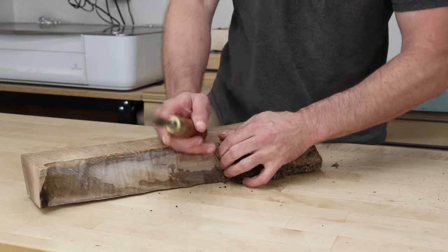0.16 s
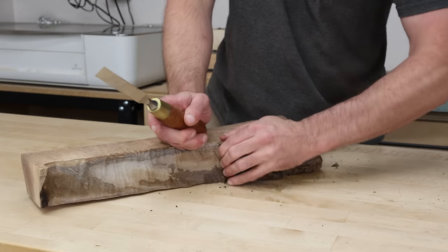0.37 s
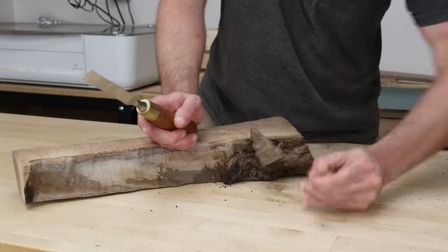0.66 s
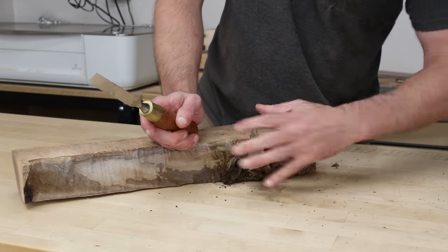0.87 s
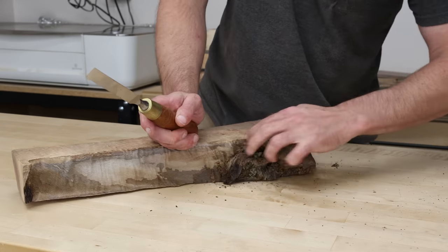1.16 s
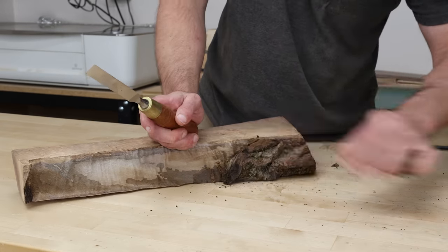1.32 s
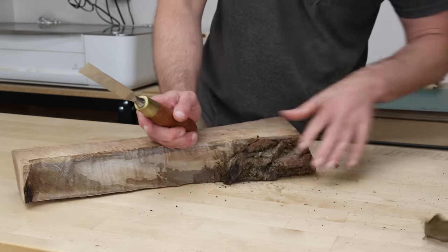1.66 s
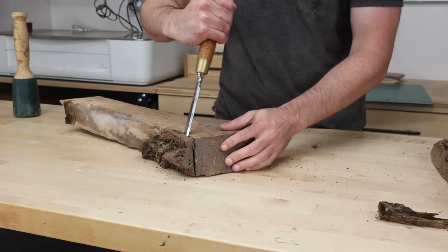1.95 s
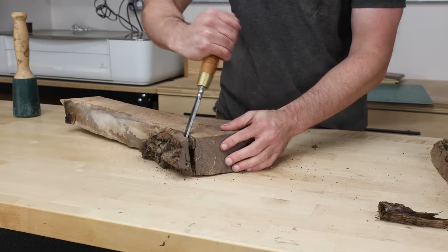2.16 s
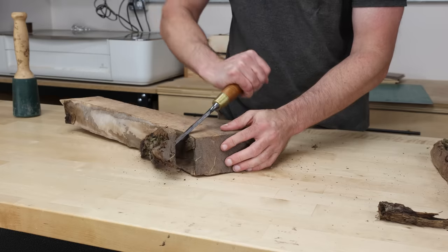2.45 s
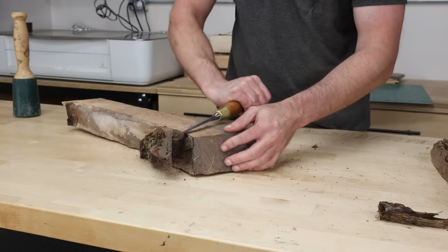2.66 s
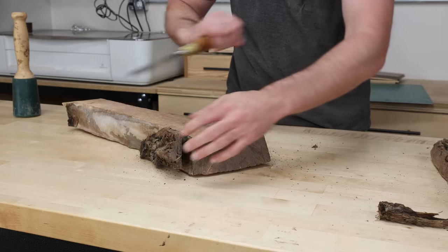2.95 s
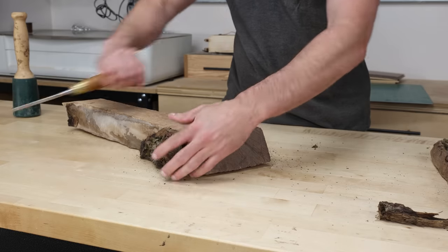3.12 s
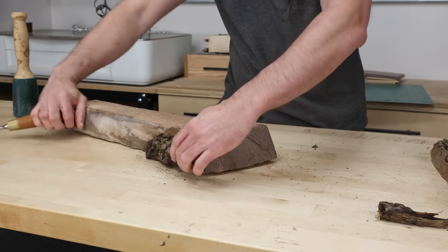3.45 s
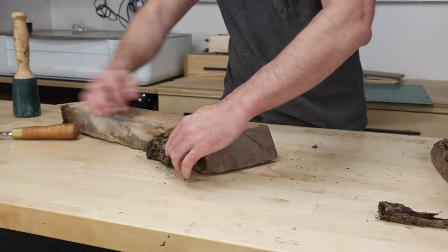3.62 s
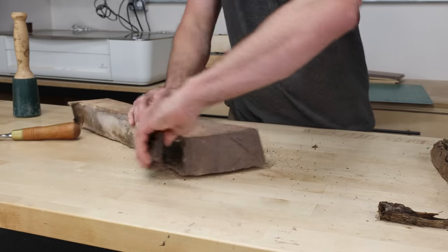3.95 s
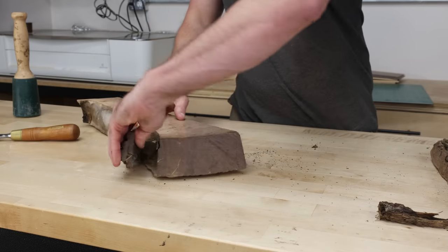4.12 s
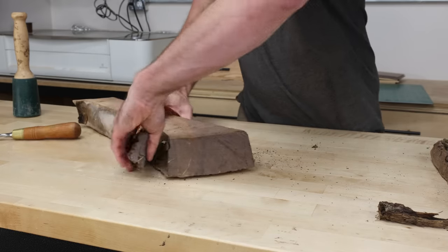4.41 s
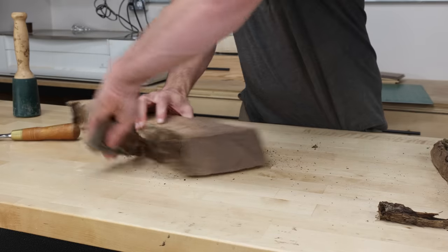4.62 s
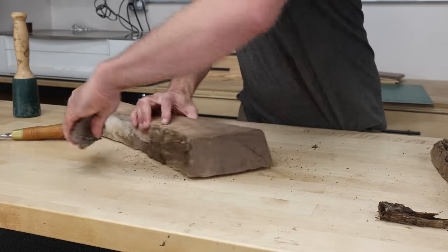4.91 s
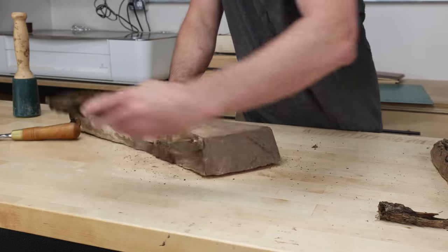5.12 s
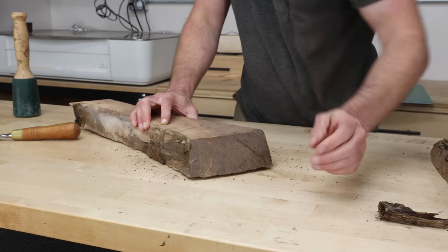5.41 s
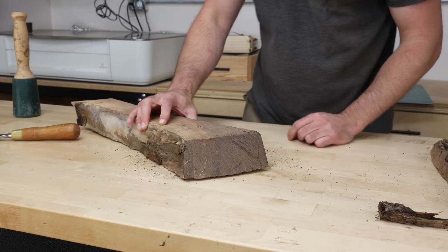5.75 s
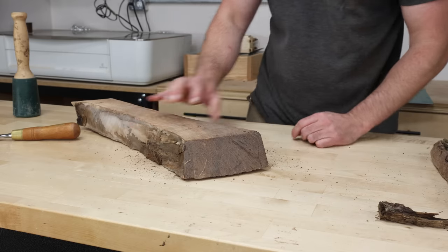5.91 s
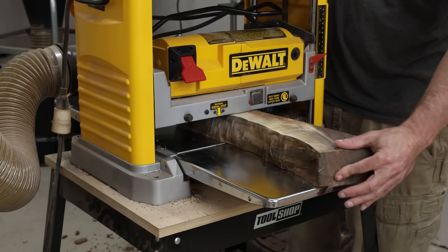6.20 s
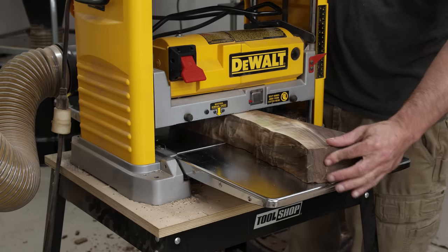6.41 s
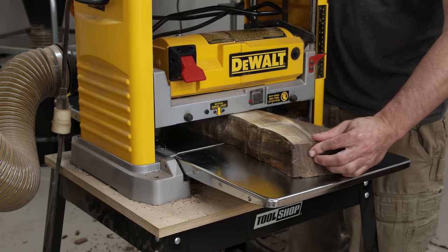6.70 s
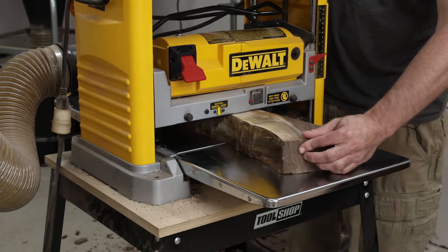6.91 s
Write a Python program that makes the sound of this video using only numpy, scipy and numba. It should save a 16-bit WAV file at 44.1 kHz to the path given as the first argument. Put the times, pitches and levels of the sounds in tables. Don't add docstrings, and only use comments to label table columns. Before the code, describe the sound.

A quiet small workshop, close and centred, with low faint hum and a short reverb. Faint rubbing and soft thumps lead to a sharp cluster of bark cracks at 0.6 s, with small snaps and crumbling around 1.1-1.3. Wooden knocks fall at 1.5-1.8. From 2.1, and densely at 2.3-2.5, a chisel pries out loud splintering cracks, thinning to ticks by 2.9. A hard tool knock hits at 3.6, followed by clunks and a brief bright steel ring near 3.8. Light dry flakes peel at 4.0-4.25; a thick ripping crack comes at 4.6-4.75 with a low puff of air. Bark clatters hollowly into a bin at 5.7 after a soft palm sweep. A planer fades in there in stereo, whining and airy; at 6.05 it bites with a burst of roar and metallic rattle, then a steady harmonic buzz sags in pitch to the end, at 7 s.

```python
import sys
import numpy as np
from scipy import signal
from scipy.fft import rfft, irfft
from scipy.io import wavfile
from scipy.ndimage import uniform_filter1d
from numba import njit

SR = 44100
rng = np.random.default_rng(int(sys.argv[2]) if len(sys.argv) > 2 else 0)


def convert_level_to_amplitude(level_db):
    exponent = np.asarray(level_db, float) / 20
    return 10 ** exponent


def int16_out(signal):
    q = np.round(np.clip(np.atleast_2d(signal).T, -1, 1) * 32767)
    wavfile.write(sys.argv[1], SR, q.astype(np.int16))


N = 311787
TIME = np.arange(N) / SR


def level(x, db):
    return x * convert_level_to_amplitude(db) / np.sqrt(np.mean(x ** 2))


@njit
def svf(x, hz, width):
    y, b, l = np.empty(len(x)), 0., 0.
    for i in range(len(x)):
        g = np.tan(np.pi * hz[i] / SR)
        v = (b + g * (x[i] - l)) / (1 + g * (g + width))
        b, l, y[i] = 2 * v - b, l + 2 * g * v, width * v
    return y


def band(x, hz, width):
    return svf(x, np.clip(hz + np.zeros(len(x)), 20, .45 * SR), width)


def band_twice(x, hz, width, second_width):
    return band(band(x, hz, width), hz, second_width)


def coloured(spectrum):
    hz, db = np.transpose(spectrum)
    f = np.arange(N // 2 + 1) * SR / N + 1
    gain = convert_level_to_amplitude(np.interp(np.log(f), np.log(hz), db))
    return level(irfft(rfft(rng.standard_normal(N)) * gain, N), 0)


def walk(rate):
    k = int(SR / rate)
    held = np.repeat(rng.standard_normal(N // k + 1), k)
    return 2.5 * uniform_filter1d(uniform_filter1d(held, k), k)[:N]


def decay(t, t60):
    return np.exp(-np.log(1000) * t / t60)


def ring(modes, weight, damping, t):
    hz, db, t60 = np.transpose(modes)[:, :, None]
    level_chance, pitch_chance = rng.standard_normal((len(modes), 2)).T[:, :, None]
    sines = np.sin(2 * np.pi * hz * (1 + .006 * pitch_chance) * t)
    return (weight * convert_level_to_amplitude(db + 1.5 * level_chance) * decay(t, t60 / damping) * sines).sum(axis=0)


def stroke(length, rise):
    u = TIME[:int(length * SR)] / length
    return np.sin(np.pi * u ** rise) ** 1.4


def add(out, s, x, db):
    i = int(s * SR)
    out[i:i + len(x)] += (x * convert_level_to_amplitude(db) / np.abs(x).max())[:N - i]


def cracks():
    # (time [s], peak [dB], ring of the bark flake [Hz])
    pick_snaps = [(.389, -38, 1150), (.4905, -44, 6000), (.5082, -40, 2800), (.5228, -42, 7840),
                  (.5595, -44, 6360), (.5783, -19.5, 3500), (.5875, -31.5, 4500), (.5934, -20.5, 4300),
                  (.6018, -15, 3470), (.6095, -27.5, 5500), (.6198, -0.5, 3700), (.626, -18, 6500),
                  (.6318, -2.5, 5200), (.6345, -13, 3000), (.6456, -16.5, 2560), (.6567, -5.5, 1240),
                  (.668, -22, 5000), (.73, -22, 3600), (1.0815, -28, 2900), (1.1378, -35, 7600),
                  (1.1565, -33, 7400), (1.199, -46, 8000), (1.233, -33, 1250), (1.262, -24, 2620),
                  (1.2662, -14.5, 2605), (1.2761, -27, 1290)]
    pry_snaps = [(2.1306, -15, 3650), (2.1385, -29, 6900), (2.2825, -7.5, 2500), (2.3035, -20.5, 3000),
                 (2.3072, -9.5, 2400), (2.3192, -7, 3000), (2.34, -14, 1260), (2.36, -10.5, 1330),
                 (2.3784, -8.5, 5670), (2.387, 0, 2700), (2.3994, -11, 2850), (2.4235, -16.5, 2616),
                 (2.433, -19.5, 3000), (2.4405, -18.5, 2300), (2.4511, -14, 2650), (2.4675, -6, 2430),
                 (2.4978, -1.5, 4620), (2.567, -31.5, 8000), (2.5995, -32, 2500), (2.606, -24.5, 2250),
                 (2.618, -31, 1490), (2.6245, -32, 3000), (2.6475, -26.5, 2120), (2.6812, -26.5, 5430),
                 (2.6956, -26.5, 1070), (2.72, -27.5, 7900), (2.75, -42, 4970), (2.769, -43.5, 7000),
                 (2.8353, -38, 3080), (2.845, -41, 3960), (2.854, -45, 4800), (2.863, -46, 3500),
                 (2.91, -49, 2500), (2.8672, -33, 4860)]
    peel_snaps = [(3.9878, -32.5, 4030), (4.0037, -30.5, 1340), (4.0079, -23.5, 1460),
                  (4.0873, -18.5, 1400), (4.0985, -28.5, 1267), (4.113, -38.5, 9000), (4.125, -18, 3410),
                  (4.1355, -22, 9460), (4.142, -31, 8000), (4.15, -23.5, 2500), (4.1574, -30, 2590),
                  (4.171, -37.5, 9000), (4.1935, -33, 4270), (4.2042, -28, 7520), (4.229, -39, 7500),
                  (4.241, -38.5, 9000), (4.25, -38, 7000), (4.3878, -30, 7930)]
    rip_snaps = [(4.6212, -7.5, 1190), (4.649, -2, 1202), (4.678, 1, 2550), (4.6945, -4.5, 2301),
                 (4.704, -20, 2500), (4.7145, -17.5, 2280), (4.733, -28, 9000), (4.7402, -10.5, 7095),
                 (4.749, -26.5, 6490), (4.7809, -30.5, 5720), (4.807, -33, 9000), (4.843, -33, 5000)]
    tool_ticks = [(1.515, -31.5, 4280), (1.5295, -33.5, 4500), (1.5665, -47, 6800), (1.6885, -22, 5200),
                  (1.714, -41, 6500), (1.7655, -40, 6000), (1.7985, -45, 5500), (1.907, -43.5, 6500),
                  (3.3289, -33, 1192), (3.4395, -29, 2000), (3.713, -38, 2380), (3.7235, -32, 4000),
                  (6.0316, -19.5, 1207)]
    steel_ticks = [
        (3.3191, -37, 4660),
        (3.3275, -29, 4700),
        (3.6328, -5.5, 3000),
        (3.797, -30.5, 4670),
        (3.842, -41, 9100),
    ]
    # (snaps, treble of a middling snap [dB], dying time [ms], width of the flake ring [share])
    stages = [(pick_snaps, -11.5, 25, .26),
              (pry_snaps, -12.5, 25, .25),
              (peel_snaps, 3.6, 23, .24),
              (rip_snaps, -11, 28, .083),
              (tool_ticks, -24, 14, .2),
              (steel_ticks, -9.5, 9, .3)]
    middling_db, treble_per_db = -22, -.5
    out, t = np.zeros(N), TIME[:8192]
    for snaps, middling_treble_db, ms, width in stages:
        for s, db, hz in snaps:
            treble_db = middling_treble_db + treble_per_db * (db - middling_db)
            envelope = np.exp(-7 * t / (ms / 1000)) + 2.6 * np.exp(-t / .0008)
            burst = rng.standard_normal(len(t)) * envelope * (1 - np.exp(-t / .00008))
            burst[1] += 11
            flake = band_twice(burst, hz, width, 2.9)
            flake += .39 * band(band(burst, 2700, 2.7), 3000, 2.8)
            flake += .1 * band(band(burst, 1.9 * hz, .2), 2.1 * hz, .68)
            flake += .35 * band(band(burst, 3.3 * hz, .1), 3.6 * hz, .69)
            spit = band_twice(burst, 10500, 1.6, 1.6)
            add(out, s, flake / np.abs(flake).max() + convert_level_to_amplitude(treble_db) * spit / np.abs(spit).max(), db)
    return out


def rustle():
    # (time [s], length [s], level [dB], pitch [Hz])
    pick_rubs = [(0.027, 0.31, -66, 5720), (0.296, 0.12, -66, 4760), (0.377, 0.068, -56.5, 5460),
                 (0.465, 0.17, -67.5, 6390), (0.571, 0.14, -47.5, 3990), (0.618, 0.084, -30.5, 5610),
                 (.68, 0.13, -55.5, 3000), (1.031, 0.173, -53.5, 3130), (1.04, 0.12, -59, 7430),
                 (1.262, 0.024, -46, 2500), (1.437, 0.052, -67.5, 5820)]
    pry_rubs = [(1.875, 0.041, -60, 4750), (1.997, 0.07, -59, 2000), (2.09, .06, -49, 3000),
                (2.13, 0.097, -56.5, 6930), (2.28, 0.14, -33.5, 2880), (2.384, 0.1, -32.5, 2705),
                (2.464, .07, -32, 2430), (2.5, .19, -50.5, 3000), (2.6, 0.22, -50.5, 2580),
                (2.82, .09, -57.5, 5196)]
    peel_rubs = [
        (3.99, 0.095, -60, 1390),
        (4.085, .14, -56, 2320),
        (4.2, 0.16, -71, 7500),
        (4.384, .15, -63.5, 2400),
    ]
    rip_rubs = [
        (4.6205, .032, -38, 3994),
        (4.648, 0.028, -35, 4110),
        (4.6773, .06, -29, 2586),
        (4.74, 0.16, -51, 3000),
    ]
    tool_rubs = [(1.684, 0.09, -65, 4760), (1.765, .07, -66, 4000), (3.44, .15, -70, 4500),
                 (3.716, 0.07, -63, 3000), (3.8, .18, -63.5, 3000)]
    steel_rubs = [
        (3.32, 0.06, -58.5, 4620),
        (3.905, 0.11, -72, 9800),
    ]
    swell_rubs = [(0.147, .085, -59, 6250), (1.2, .085, -44.5, 1320), (1.236, .05, -44.5, 2685),
                  (2.003, .04, -52.5, 6320), (2.062, .07, -46, 1347), (2.065, .05, -50, 6400),
                  (2.256, .03, -44, 2500), (4.579, .045, -60.5, 2004), (4.867, .06, -44, 2300),
                  (4.935, .085, -47, 3000)]
    # (rubs, treble [dB], lateness of the swell [exponent], hollow note [dB], broad hiss [dB])
    strokes = [(pick_rubs, -10, .63, -15, 0), (pry_rubs, -7.5, .5, -9, 1), (peel_rubs, 5.6, .44, -6, 3.6),
               (rip_rubs, -7, .46, -6, 4.1), (tool_rubs, -25, .4, -10.5, -2),
               (steel_rubs, -1.7, .5, -12.5, 1.8), (swell_rubs, -18, 1.5, -14, -5)]
    out = np.zeros(N)
    crumbs = (rng.random(N) < 500 / SR) * convert_level_to_amplitude(2.2 * rng.exponential(size=N))
    crumbs = signal.lfilter([1], [1, -np.exp(-1 / (.00074 * SR))], crumbs)
    grit = (crumbs + 1.5) * convert_level_to_amplitude(1.6 * walk(110)) * rng.standard_normal(N)
    for rubs, treble_db, late, hollow_db, broad_db in strokes:
        for s, length, db, hz in rubs:
            shape, i = stroke(length, late), int(s * SR)
            x = grit[i:i + len(shape)]
            body = level(band_twice(x, hz, .53, 1), -4)
            body += level(band_twice(x, 4200, 2.3, 2.3), broad_db)
            body += level(band_twice(x, 1280, .12, .3), hollow_db) + level(band(x, 2500, .15), -10.5)
            body += level(band_twice(x, 12000, 1.2, 1.2), treble_db)
            out[i:i + len(shape)] += convert_level_to_amplitude(db) * shape * body
    return out


def knocks():
    # (time [s], peak [dB], best-driven pitch [Hz], damping [factor])
    thumps = [(.272, -28, 230, 1), (.679, -28.5, 288, 1.2), (.727, -34, 323, 1.15), (1.032, -36, 294, 0.94),
              (1.044, -32, 323, 1.5), (1.801, -36.5, 145, 1.8), (2.073, -25, 208, 0.79),
              (2.108, -20, 330, 1.34), (2.715, -28, 148, 2.5), (2.85, -33.5, 140, 3.7),
              (3.949, -30.5, 416, 0.36), (4.388, -37, 323, 0.94)]
    hard_knocks = [(.204, -49, 226, 2.8), (.311, -44, 325, 0.9), (.388, -30.5, 904, 5.5),
                   (.655, -21, 1133, 4.8), (1.5135, -21, 890, 1.2), (1.678, -16.5, 511, 1.24),
                   (1.765, -16, 930, 2.76), (1.999, -36.5, 128, 0.79), (2.025, -22.5, 142, 2),
                   (2.308, -26.5, 213, 0.43), (2.469, -18.5, 1120, 2.2), (2.495, -14.5, 720, 3.4),
                   (3.439, -17, 323, 1.92), (3.604, -18.5, 149, 5.5), (3.6335, 1.5, 816, 2.4),
                   (3.7115, -10.5, 918, 1.4), (3.723, -8.5, 804, 0.95), (3.7885, -2.5, 750, 3.3),
                   (3.797, -9, 920, 3.7), (3.87, -13, 644, 1.54), (4.028, -38, 430, 0.31),
                   (4.407, -39.5, 325, 0.58), (4.68, -10.5, 1205, 5), (4.712, -17.5, 460, 1.6),
                   (4.747, -23.5, 127, 1.9), (4.998, -39, 315.6, 1.03), (5.205, -40.5, 293, 1.15),
                   (5.524, -41.5, 339, 0.66), (5.596, -36, 199, 1.2), (6.031, -25, 710, 1.3)]
    slaps = [
        (1.5285, -6.5, 700, 2.36),
        (2.384, -19, 765, 0.75),
        (3.818, -11, 723, 1.14),
        (3.841, -8, 603, 1.55),
        (4.885, -39.5, 675, 0.87),
    ]
    hollow_notes = [(.271, -41, 875, 1.5), (.658, -17, 1150, 4), (1.2665, -22, 1300, 6),
                    (1.2765, -32, 1300, 6), (2.08, -28, 1300, 3), (2.362, -27.5, 1250, 3.7),
                    (2.499, -21, 900, 3.5), (2.023, -24, 1250, 4), (2.284, -23, 1250, 1),
                    (3.439, -17.5, 860, 0.97), (4.622, -20, 1210, 1.2), (4.649, -16.5, 1177, 1.1)]
    contacts = [(thumps, .51), (hard_knocks, .98), (slaps, .75), (hollow_notes, .22)]
    # (frequency [Hz], level [dB], t60 [s])
    bench_modes = [(140, 0.5, 0.37), (173, -3.5, 0.17), (226, 0.5, 0.21), (296, -2, 0.23), (323, 5, 0.22),
                   (374.4, 6, 0.1), (448, 5, .12), (480, -5.5, 0.17)]
    slab_modes = [(647, -4.5, 0.15), (754, 9.5, 0.055), (860, 2, 0.13), (1012, 0, 0.05), (1194, -3, 0.13),
                  (1342, -1, 0.076), (1380, -4, .04), (1890, -1, .036), (2010, -9, .05), (2420, -15, .05)]
    modes = bench_modes + slab_modes
    out, t = np.zeros(N), TIME[:16384]
    for blows, reach in contacts:
        for s, db, hz, damping in blows:
            damping = np.clip(damping, .3, 5)
            octaves = np.log2(np.array(modes)[:, :1] / hz)
            tones = ring(modes, np.exp(-.5 * (octaves / reach) ** 2), damping, t)
            push = np.sin(np.pi / 2 * np.clip(t * hz / .83, 0, 1)) ** 2
            blur = band_twice(rng.standard_normal(len(t)), hz, 1.3 * reach, 1.3 * reach)
            blur = band_twice(blur, hz, 3.9, 3.9) * np.exp(-damping * t / .022)
            add(out, s, push * (tones / np.abs(tones).max() + .18 * blur / np.abs(blur).max()), db)
    return signal.sosfilt(signal.butter(2, 110, "high", fs=SR, output="sos"), out)


def blade():
    # (time [s], peak [dB])
    hits = [
        (1.689, -45),
        (3.44, -47),
        (3.637, -45),
        (3.721, -43.5),
        (3.798, -26.5),
        (3.842, -37.5),
        (3.872, -43),
    ]
    blade_modes = [(3230, 0, 0.084), (4640, -4, 0.081), (5020, -11, .06), (6670, -19, .1),
                   (9100, -21.5, .04), (11900, -17, .03)]
    out = np.zeros(N)
    for s, db in hits:
        add(out, s, ring(blade_modes, 1, 1, TIME[:16384]), db)
    return out


def bark_in_bin():
    start_s, peak_db, clatter_t60_s = 5.692, -7.5, .25
    wall_rings = [(1223, 0.32, 0.5), (1460, 0.27, 4), (2250, 0.39, -5), (3905, 0.18, -3.5), (3000, 3.1, -2)]  # (frequency [Hz], width [share], level [dB])
    drum_modes = [(172.7, 0, 0.39), (265, -9.5, 0.41), (308.6, 2, 0.187), (855, -1.5, .15)]  # (frequency [Hz], level [dB], t60 [s])
    # (time [s], peak [dB])
    bounces = [
        (5.686, -19.5),
        (5.6925, -8),
        (5.698, -9),
        (5.7025, -9),
        (5.7195, -15.5),
    ]
    out, t = np.zeros(N), TIME[:30000]
    clatter = rng.standard_normal(len(t)) * convert_level_to_amplitude(1.1 * walk(120)[:len(t)])
    clatter *= decay(t, clatter_t60_s) * (1 - np.exp(-t / .0013))
    walls = sum(level(band(band(clatter, hz, width), hz, 1.5), db) for hz, width, db in wall_rings)
    add(out, start_s, walls, peak_db)
    for s, bounce_db in bounces:
        tap = rng.standard_normal(2048) * np.exp(-t[:2048] / .0022)
        walls = sum(level(band(band(tap, hz, width), 1600, 1.8), db) for hz, width, db in wall_rings)
        add(out, s, walls, bounce_db)
    add(out, start_s, ring(drum_modes, 1, 1, t) * (1 - np.exp(-t / .004)), peak_db - 11)
    return out


def palm():
    start_s, length_s, hiss_db, pitch_hz = 5.575, .16, -55.5, 5801.5
    out, shape, noise = np.zeros(N), stroke(length_s, 1), rng.standard_normal(SR)
    hiss = level(band_twice(noise, pitch_hz, .46, 1.5), hiss_db) + level(band(noise, 9000, 3.9), hiss_db + 1)
    out[int(start_s * SR):][:len(shape)] = shape * hiss[:len(shape)]
    return out


def knife_tones(turn, tone_db, cutting, side):
    loaded = [-28, -21.5, 1.5, -40, -21, -14, -29, -11, -8, -21, -12.5, -9.5, -18, -15, -13, -15.5, -14,
              -11, -20, -17, -16, -30, -11.5, -13, -22.5, -22, -19, -21, -24, -18, -28, -27, -24, -29, -29,
              -22.5]
    idling = [(1, -18), (3, 2), (6, -10), (9, -14), (23.7, -8)]  # (multiple of the shaft rate, level [dB])
    pan_db = -.8
    out = np.zeros((2, len(turn)))
    for orders, share in ((enumerate(loaded, 1), cutting), (idling, 1 - cutting)):
        for k, db in orders:
            phase, lean = rng.standard_normal(2)
            drift_db = 0 if k == 3 else 1.6 * walk(10)[-len(turn):] - 1
            waver = convert_level_to_amplitude(drift_db + (.6 * lean + pan_db) * side)
            lag = min(k / 14, .8) * (.4 + .2 * lean) * side
            tone = np.sin(k * turn + 3 * phase + lag)
            out += share * waver * convert_level_to_amplitude(db + tone_db + (1.5 if k == 3 else 3)) * tone
    return out


def chip_roar(turn, hz, roar_db, cutting, side):
    roar_density = [(70, -54), (320, -17.5), (850, -25), (1450, -11.5), (3500, -13), (8500, -28.5),
                    (12000, -34), (15300, -29.5)]
    chop = 1 + .12 * cutting * np.sin(3 * turn)
    wide = level(band(coloured(roar_density), 7000, 3.5), -5.5)
    roar = (coloured(roar_density) + side * wide)[:, -len(turn):]
    whine = level(band(rng.standard_normal(len(turn)), 63.3 * hz, .0062), -23.5)
    whine *= convert_level_to_amplitude(-4 * cutting)
    return convert_level_to_amplitude(roar_db - 1) * chop * roar + convert_level_to_amplitude(roar_db) * whine


def steel_tray(t, turn, side):
    # (time [s], level [dB])
    bite = [
        (6.035, -63.5),
        (6.047, -34.5),
        (6.1, -42),
        (6.16, -44),
        (6.2, -64),
    ]
    tray_rings = [(4930, 910, 2), (9000, 3200, -10), (2500, 2500, -3.5)]  # (frequency [Hz], width [Hz], level [dB])
    cycles = turn / (2 * np.pi)
    blows = np.diff(np.floor(cycles), prepend=0) * convert_level_to_amplitude(2 * rng.standard_normal(len(t)))
    blows += 1.1 * np.diff(np.floor(3 * cycles), prepend=0) + .035 * rng.standard_normal(len(t))
    tray = sum(level(band_twice(blows, f, w / f, w / f), db) for f, w, db in tray_rings)
    return convert_level_to_amplitude(np.interp(t, *np.transpose(bite))) * (tray + .4 * side * np.roll(tray, 9))


def planer():
    # (time [s], cutter shaft rate [turns/s], knife tone [dB], air and chips [dB])
    course = [
        (5.68, 169.3, -41.5, -51.5),
        (5.842, 168.9, -46, -44.5),
        (6.025, 168.6, -42.5, -42),
        (6.061, 166.1, -59, -36),
        (6.148, 163.9, -47, -46.5),
        (6.299, 160.4, -46, -46.5),
        (6.501, 157, -45, -47),
        (6.751, 153.1, -44.5, -47),
        (7.07, 151.4, -46.5, -46.5),
    ]
    casing_rings = [(1455, 43, -1), (2220, 130, -11), (3650, 110, -9)]
    start = int(course[0][0] * SR)
    t, (s, *columns) = TIME[start:], np.transpose(course)
    hz, tone_db, roar_db = (np.interp(t, s, column) for column in columns)
    turn, side = 2 * np.pi * np.cumsum(hz) / SR, np.array([[1], [-1]])
    cutting = np.clip((t - 6.03) / .023, 0, 1)
    out = np.zeros((2, N))
    out[:, start:] = knife_tones(turn, tone_db, cutting, side) + chip_roar(turn, hz, roar_db, cutting, side)
    out += sum(convert_level_to_amplitude(db) * np.array([band(port, f, w / f) for port in out]) for f, w, db in casing_rings)
    out[:, start:] += steel_tray(t, turn, side)
    return out


def draughts():
    # (time [s], length [s], level [dB])
    passes = [
        (0.737, 0.26, -55.5),
        (2.716, .12, -62),
        (4.463, 0.088, -59),
        (3.6, 0.066, -52.5),
        (3.772, 0.071, -57),
        (4.679, 0.31, -47.5),
        (5.577, 0.11, -57),
    ]
    out, air = np.zeros(N), level(band(band(rng.standard_normal(N), 44.8, 1.8), 45, 1.8), 0)
    for s, length, db in passes:
        shape, i = stroke(length, .67), int(s * SR)
        out[i:i + len(shape)] += convert_level_to_amplitude(db) * shape * air[i:i + len(shape)]
    return out


def room(x):
    t60_s, treble_t60_s, tail_db = .29, .088, -14
    t = TIME[:int(.6 * SR)]
    noise = rng.standard_normal(len(t)) * np.clip((t - .003) / .0049, 0, 1)
    tail = band(noise, 610, 3.7) * decay(t, t60_s) + 1.1 * noise * decay(t, treble_t60_s)
    return signal.fftconvolve(x, tail * convert_level_to_amplitude(tail_db) / np.sqrt(np.sum(tail ** 2)))[:N]


def workshop():
    shop_density = [(15, -44.5), (25, -31), (125, -16), (217, -10.5), (293, -10), (620, -22), (1020, -25.5),
                    (16000, -49.5)]
    shop_db, hiss_db, end_s = -63, -76, 6.15
    hum = level(coloured(shop_density) * convert_level_to_amplitude(1.1 * walk(6.8)), shop_db)
    hiss = level(rng.standard_normal(N), hiss_db)
    return (hum + hiss) * np.clip((end_s - TIME) * 50, 0, 1)


def scene():
    bench = cracks() + rustle() + knocks() + blade() + bark_in_bin()
    return bench + room(bench) + palm() + planer() + draughts() + workshop()


def top_cut(x):
    return signal.sosfilt(signal.butter(12, 17000, fs=SR, output="sos"), x)


def record(dry):
    top_hz = 15800
    x = 1.02 * np.tanh(dry / 1.153) + convert_level_to_amplitude(-101) * rng.standard_normal(dry.shape)
    x = signal.sosfilt(signal.butter(16, 16600, fs=SR, output="sos"), x)
    low = irfft(rfft(x) * (np.arange(N // 2 + 1) * SR / N < top_hz), N)
    edge = x - low
    loud = uniform_filter1d(edge ** 2, size=1024) > convert_level_to_amplitude(-92)
    return top_cut(low + uniform_filter1d(1. * loud, size=256) * edge)


dry = scene()
out = record(dry)
int16_out(out)
```